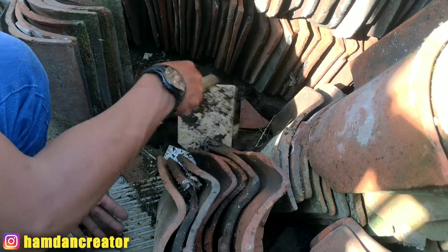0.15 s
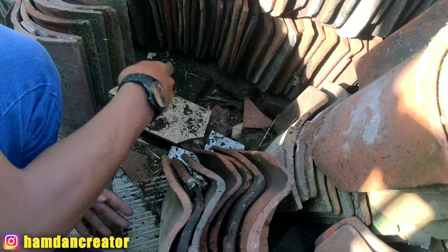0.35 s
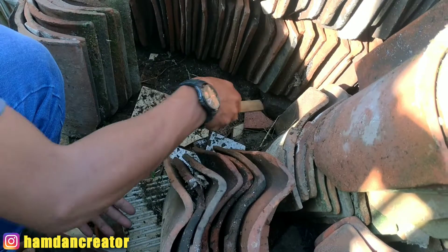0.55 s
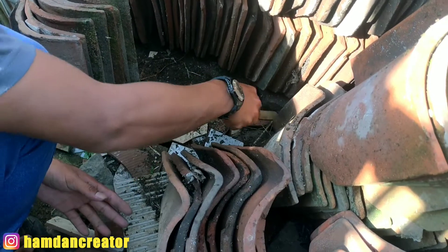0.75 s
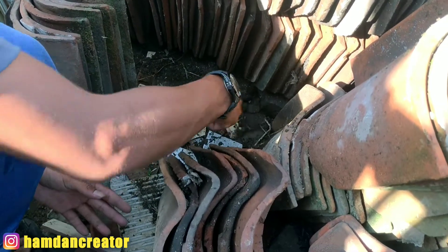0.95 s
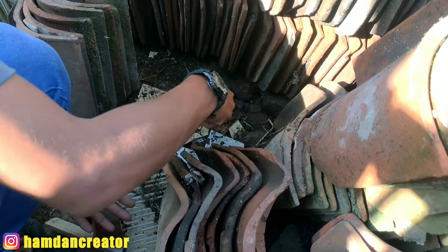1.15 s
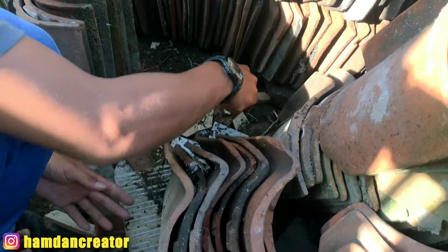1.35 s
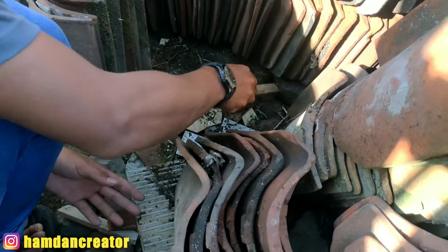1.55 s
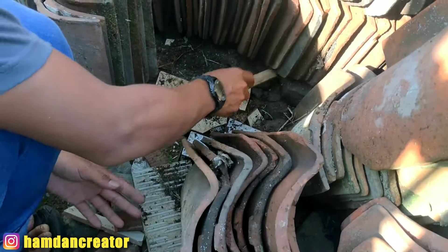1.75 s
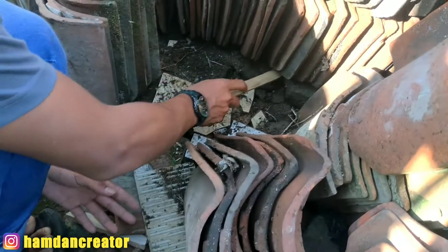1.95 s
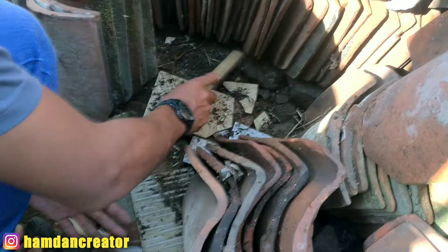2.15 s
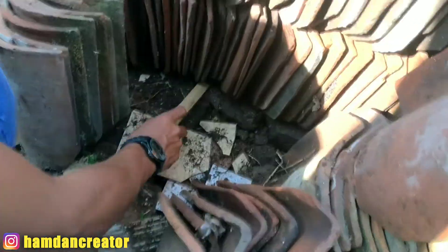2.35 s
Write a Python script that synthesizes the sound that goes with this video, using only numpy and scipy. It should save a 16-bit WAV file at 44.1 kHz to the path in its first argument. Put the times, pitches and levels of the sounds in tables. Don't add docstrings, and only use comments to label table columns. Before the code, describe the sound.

Clay roof tiles knock together, close and outdoors. Gritty scraping and a light knock start it; from 0.24 to 0.46 s irregular clacks crowd together, one ringing at 0.36 then deadened on soil. Faint scrapes and ticks follow from 0.73, then the loudest hard crack at 0.98-1.0. After a near-quiet gap, small ticks at 1.7, a sharper click at 2.1 and soft rustling ticks from 2.3, with quick echoes over faint low traffic hum.

```python
import sys
import numpy as np
from scipy import signal
from scipy.fft import rfft, irfft
from scipy.io import wavfile

SR = 44100
rng = np.random.default_rng(int(sys.argv[2]) if len(sys.argv) > 2 else 0)


def gain_from_db(level_db):
    decades = np.asarray(level_db, float) / 20
    return 10 ** decades


def wrap_up_sound(samples):
    columns = np.atleast_2d(samples).T
    tamed = np.clip(columns, -1, 1)
    steps = np.round(tamed * 32767).astype(np.int16)
    wavfile.write(sys.argv[1], SR, steps)


N = 110250

# [f/Hz, correlation]
AIR_SPECTRUM = [(15, -38), (25, -27.5), (59, -1), (260, -8.5), (313, -12.5), (421, -13.5), (2230, -17),
                (5500, -22), (15500, -37)]
AIR_LIKENESS = [(60, 0.91), (150, 1), (380, 0.56), (2380, -0.13), (15000, 0.078)]

# [t/s, length/s, level/dB, brightness/dB per octave]
SCRAPES = [(0.01, 0.068, -35, 4), (0.067, 0.072, -46, 3.5), (0.116, 0.096, -30.5, 3),
           (0.199, 0.057, -39, 2), (0.408, 0.11, -35, 1.8), (0.732, 0.18, -41.5, 0.5),
           (0.818, 0.11, -54.5, 8), (0.899, 0.044, -36.5, 2.5), (0.932, 0.13, -35, 1.5), (1, .045, -42, 15),
           (1.682, 0.11, -47.5, 0.5), (2.072, 0.056, -34, -1.2), (2.28, 0.054, -44, 2),
           (2.35, 0.11, -52, 5.5), (2.413, 0.11, -43.5, -1.1)]
# [f/Hz, level/dB per Hz]
GRIT_SPECTRUM = [(150, 7), (250, -0.5), (669, -1), (809, -5.5), (1360, -15), (2800, -9), (3110, -7),
                 (4320, -12), (15500, -27)]
# [f/Hz, level/dB, t60/s]
HELD_TILE_MODES = [(824, -3.5, 0.022), (1550, -7.5, 0.03), (2027, -1.5, 0.022), (2785, 1.5, 0.022),
                   (4040, -16, .02), (4270, -6, 0.02), (4660, -5.5, .01), (5170, -7.5, .012),
                   (6630, -6.5, 0.0031), (9300, -15.5, 0.013), (10800, -15.5, 0.0055),
                   (12760, -19.5, 0.0036)]

# [t/s, peak level/dB]
THUDS = [
    (0.098, -25.5),
    (0.741, -27),
    (2.466, -28),
]

# [f/Hz, level/dB, t60/s]
FACE_MODES = [(780, -1.5, 0.54), (879, -5.5, 0.25), (1939, -11, 0.15), (2130, -23, 0.092),
              (2500, -13, 0.12), (2600, -7, 0.069), (3350, -18, .076), (4212, -4, 0.061), (5096, -2, 0.059),
              (5180, -3, 0.052), (5740, -19, 0.048), (6550, -10.5, 0.04), (6971, -23, 0.044),
              (8990, -12.5, 0.042)]
EDGE_MODES = [(840, -7, 0.11), (1570, 11, 0.043), (4650, 2.5, 0.11), (5610, -2.5, 0.074), (9000, -9, 0.033)]
BACK_MODES = [(778.7, -7, 0.23), (878, -15, 0.19), (1542, -19, 0.21), (2478, -8.5, 0.1),
              (2449, -5.5, 0.095), (3377, -5.5, 0.043), (4177, -10, 0.047), (4630, -13.5, 0.043),
              (5070, -11, 0.03), (6720, -19, 0.034)]
CORNER_MODES = [(1556, -15.5, 0.15), (2726, -12.5, 0.1), (3560, -11, 0.036), (4190, 0, 0.035),
                (4600, -11, 0.057), (4850, -18, .07), (5150, 0, 0.036), (5850, -2.5, 0.033),
                (6476, -8.5, 0.049), (11100, -31, 0.059)]
ROCKING_MODES = [(795.4, -9.5, 0.15), (876, -5, 0.12), (1573, 0.5, 0.089), (2470, -3.5, 0.095),
                 (4640, -7.5, 0.074)]
CHIP_MODES = [(3400, -15, .05), (4700, -19, 0.054), (6830, -3, 0.05), (8650, -16, 0.041),
              (11470, -9, 0.022), (12600, -16, .03), (14800, -17, .02)]
# [t/s, peak level/dB, ring level/dB re peak, hardness/dB per octave, crack level/dB re peak]
FACE_BLOWS = [
    (0.139, -17.5, -13.5, -1.4, 1),
    (0.355, -1, -7.5, 0.33, -6),
    (0.367, -14, -13.5, -0.74, 1),
]
EDGE_BLOWS = [
    (0.2396, -11, -11.5, 0, 4.5),
    (0.245, -6, -38, 1.5, -1.5),
]
BACK_BLOWS = [
    (.2730, -14.5, -7.5, 0.8, -11),
    (0.9766, -6.5, -22, 4.9, 3.5),
    (.9940, 2.5, -7.5, 0.64, -3.5),
    (1.011, -17.5, -7, 0.34, -24),
    (1.0745, -27.5, -8, 0.33, -16),
]
CORNER_BLOWS = [
    (.2970, -10.5, -8.5, 2.2, -4.5),
    (.3110, -4.5, -7.5, 0.44, -2.5),
    (0.4374, -19, -30, 2.1, 6.5),
]
ROCKING_BLOWS = [
    (0.413, -12, -6.5, 1, -11),
    (0.423, -15, -10, -2, 2),
    (0.46, -13, -9, -6, -5),
    (0.53, -30.5, -7.5, -4, 3.5),
]
CHIP_BLOWS = [
    (0.848, -20.5, -1.8, 0.1, -11.5),
]
# [f/Hz, level/dB per Hz]
CRACK_SPECTRUM = [(88, -45), (150, -31), (420, -13.5), (660, 4), (3040, -4), (5030, -6), (7130, -6.5),
                  (7860, -29), (9920, -12.5), (15500, -68)]

# [t/s, peak level/dB, f/Hz, t60/s, broad part
# level/dB]
TICKS = [(0.355, 4.5, 693, 0.014, -23), (0.747, -31, 456, 0.037, 1), (0.779, -29.5, 653, 0.023, -19),
         (0.824, -23, 1920, 0.017, 4), (0.915, -29.5, 3500, 0.042, -2), (1.144, -29, 1442, 0.056, -3),
         (1.692, -24.5, 540, 0.045, -1), (2.052, -27, 662, 0.089, -11.5),
         (2.106, -10.5, 1943, 0.014, 0.5), (2.122, -27.5, 556, 0.1, -5),
         (2.166, -24, 2200, 0.028, -1.5), (2.307, -31, 1375, 0.043, -11),
         (2.345, -17.5, 735, 0.014, -4.5), (2.375, -29, 1180, 0.028, -4),
         (2.447, -21, 730, 0.033, -14), (2.464, -27, 693, 0.074, -6),
         (0.366, -14, 6800, 0.01, -3), (0.4131, -6, 4210, 0.025, -9), (.438, -11.5, 4700, 0.011, -5),
                (.441, -24, 8270, 0.046, -12), (0.91, -28, 5900, 0.014, 2), (0.96, -32, 3520, .012, -9),
                (1, -32, 11700, .012, -3), (.844, -25, 11700, 0.013, -13), (.917, -29, 910, 0.018, -6),
                (0.59, -30, 6800, 0.0092, -4), (1.1, -36, 11800, .015, -12), (.955, -22, 6500, 0.018, -9),
                (0.9766, -2, 7260, .012, -14), (1.703, -29, 800, 0.024, 0), (2.1, -40, 10300, .012, -3),
                (2.1072, -8.5, 3400, 0.015, -2.5), (2.111, -11, 5370, .01, -13),
                (2.116, -19, 1050, .025, -17), (2.126, -21, 6300, 0.0085, 5),
                (2.134, -27.5, 420, 0.039, -12), (2.4, -30, 3900, .012, -6),
                (2.3453, -17.5, 5050, 0.0062, -12), (2.378, -27, 3900, .008, -6),
                (2.472, -26.5, 976, 0.033, -8)]

# [f/Hz, level/dB]
PORT_BALANCE = [(240, 0), (950, -1), (1600, -4), (2500, 5), (3600, -5.5), (5000, -13), (9000, -1),
                (15000, 9.5)]
SOIL_PORT_BALANCE = [(300, -0.3), (1000, 3.5), (2500, 0.3), (5000, -3), (10000, -1.3)]

CONTACT_S = 0.0017


def rms_one(x):
    return x / np.sqrt(np.mean(x ** 2) + 1e-20)


def at_hz(points, hz):
    table_hz, value = np.array(points)[:, :2].T
    return np.interp(np.log(hz), np.log(table_hz), value)


def colour(x, points, slope_db=0.):
    hz = np.maximum(np.fft.rfftfreq(x.shape[-1], 1 / SR), 10)
    gain = gain_from_db(at_hz(points, hz) + slope_db * np.log2(hz / 3000))
    return irfft(rfft(x) * gain, x.shape[-1])


def drift(rate):
    r = np.exp(-80 * np.pi * rate / SR)
    slow = signal.lfilter([1], [1, -2 * r, r * r], rng.standard_normal(N // 40 + 2002))[2000:]
    return np.interp(np.arange(N) / 40, np.arange(len(slow)), rms_one(slow))


def ring(clicks, hz, t60):
    r = gain_from_db(-60 / (np.clip(t60, 0.004, 0.4) * SR))
    w = 2 * np.pi * hz / SR
    return signal.lfilter([0, np.sin(w)], [1, -2 * r * np.cos(w), r * r], clicks + 1e-18)


def add(out, s, x):
    i = int(s * SR)
    out[i:i + len(x)] += x[:N - i]


def dying(t60, size=6000):
    return gain_from_db(-60 * np.arange(size) / SR / max(t60, 0.003))


def air():
    patchy_db, air_db = 3, -46.5
    hum_hz, hum_width_hz, hum_db = 53.7, 6.5, -56.5
    out = 0
    together = drift(2.5)
    edges = 22 * 2 ** np.arange(0, 9.6, 0.5)
    white = rng.standard_normal((2, 2, N))
    for k, (low, high) in enumerate(zip(edges, edges[1:])):
        band = signal.butter(2, [low, high], "band", fs=SR, output="sos")
        mid, side = signal.sosfilt(band, white[k % 2])
        hz = np.sqrt(low * high)
        alike = np.clip(at_hz(AIR_LIKENESS, hz), -1, 1)
        flicker_db = patchy_db * min(1, 300 / hz) ** 0.5 * (0.5 * together + drift(10))
        stereo = np.sqrt(1 + alike) * mid + np.sqrt(1 - alike) * side * [[1], [-1]]
        out = out + gain_from_db(at_hz(AIR_SPECTRUM, hz) + flicker_db) * stereo
    hum = rms_one(ring(rng.standard_normal(N), hum_hz, 6.1 / hum_width_hz))
    return gain_from_db(air_db) * rms_one(out) + gain_from_db(hum_db) * np.array([hum, 0.7 * np.roll(hum, 90)])


def grit_grains():
    grains_per_s, spread_db, stutter_db, stutter_per_s = 5000, 5, 1.5, 70
    size_db = spread_db * np.minimum(rng.exponential(1, N), 3)
    height = gain_from_db(size_db + stutter_db * drift(stutter_per_s))
    return height * rng.choice([-1, 1], N) * (rng.random(N) < grains_per_s / SR)


def held_tile(grains):
    flicker_db, flicker_per_s = 5, 25
    body = 0
    for hz, db, t60 in HELD_TILE_MODES:
        body = body + gain_from_db(db + flicker_db * drift(flicker_per_s)) * rms_one(ring(grains, hz, t60))
    return rms_one(body)


def scrapes():
    ring_db, on_soil_s, on_soil_db = -2.5, 0.6, -9
    rise, fall = 0.23, 0.3
    grains = grit_grains()
    ring_gain = gain_from_db(ring_db + on_soil_db * (np.arange(N) > on_soil_s * SR))
    grit = rms_one(colour(grains, GRIT_SPECTRUM)) + ring_gain * held_tile(grains)
    out = np.zeros(N)
    for s, length, db, slope_db in SCRAPES:
        u = np.linspace(0, 1, 2 + int(length * SR))
        stroke = np.clip(np.minimum(u / rise, (1 - u) / fall), 0, 1)
        part = grit[int(s * SR):][:len(u)]
        tilted = rms_one(colour(part, [(1, 0), (2, 0)], slope_db))
        add(out, s, gain_from_db(db) * stroke[:len(part)] * tilted)
    return out


def thuds():
    out = np.zeros(N)
    for s, db in THUDS:
        rumble = rms_one(ring(rng.standard_normal(6000), 70, 0.0215))
        add(out, s, gain_from_db(db + 4.5) * rumble * dying(0.082) * (1 - dying(0.1)))
    return out


def crack(slope_db):
    split_hz = 7300
    noise = rms_one(colour(rng.standard_normal(6000), CRACK_SPECTRUM, slope_db))
    top = signal.sosfilt(signal.butter(2, split_hz, "high", fs=SR, output="sos"), noise)
    low = signal.sosfilt(signal.butter(2, split_hz, fs=SR, output="sos"), noise)
    snap = gain_from_db(6) * dying(0.0036)
    tail = gain_from_db(-19.5) * dying(0.22)
    envelope = (1 - dying(CONTACT_S)) * (snap + dying(0.017) + tail)
    return gain_from_db(-1.0) * top * dying(0.0077) + gain_from_db(-3.5) * (low + gain_from_db(-7.5) * top) * envelope


def piece(modes, blows):
    out = np.zeros(N)
    s, db, ring_db, hard_db, crack_db = np.transpose(blows)
    for hz, level_db, t60 in modes:
        clicks = np.zeros(N)
        clicks[(s * SR).astype(int)] = gain_from_db(db + ring_db + level_db + hard_db * np.log2(hz / 2000))
        out += ring(clicks, hz, t60)
    for at, peak_db, slope_db in zip(s, db + crack_db, hard_db):
        add(out, at, gain_from_db(peak_db) * crack(slope_db))
    return out


def ticks():
    out = np.zeros(N)
    for s, db, hz, t60, wide_db in TICKS:
        rough, broad = rng.standard_normal((2, 6000))
        body = ring(rough * dying(0.013), hz, t60)
        wide = rms_one(colour(broad, CRACK_SPECTRUM)) * dying(t60) * (1 - dying(CONTACT_S))
        add(out, s, gain_from_db(db - 6.5) * (body / np.abs(body).max() + gain_from_db(wide_db) * wide))
    return out


def hollow(x, lead, pan_db, soil=0):
    left_lead_s, delay_s, work_low_hz = 0.00014, 0.000818, 197
    echo_db, echo_t60_s, echo_low_hz, echo_cut_hz = -5, 0.051, 1020, 12000
    size = N + 8000
    hz = np.maximum(np.fft.rfftfreq(size, 1 / SR), 10)
    balance_db = at_hz(PORT_BALANCE, hz) + soil * at_hz(SOIL_PORT_BALANCE, hz) + pan_db
    half = gain_from_db(balance_db / 2) * np.exp(1j * np.pi * hz * lead * left_lead_s)
    echoes = rng.standard_normal((2, 6000)) * dying(echo_t60_s) * (np.arange(6000) > 60)
    echoes = gain_from_db(echo_db) * rfft(echoes / np.sqrt(np.sum(echoes ** 2) / 2), size)
    echoes = echoes / (1 + 1j * hz / echo_cut_hz) / (1 - 1j * echo_low_hz / hz)
    path = np.exp(-2j * np.pi * hz * delay_s) / (1 - 1j * work_low_hz / hz) ** 2
    return irfft(rfft(x, size) * path * (np.array([half, 1 / half]) + echoes), size)[:, :N]


def scene():
    lands_s, landed_t60_s = 0.408, 0.089
    damped = gain_from_db(-60 * np.maximum(np.arange(N) / SR - lands_s, 0) / landed_t60_s)
    front = damped * piece(FACE_MODES, FACE_BLOWS)
    front = front + piece(ROCKING_MODES, ROCKING_BLOWS) + piece(EDGE_MODES, EDGE_BLOWS)
    back = piece(BACK_MODES, BACK_BLOWS) + piece(CORNER_MODES, CORNER_BLOWS) + piece(CHIP_MODES, CHIP_BLOWS)
    work = hollow(front, 0.98, -0.83) + hollow(back, 0.18, 0.17)
    work = work + hollow(ticks(), -0.62, 0.33, 0.88) + hollow(scrapes(), 0.73, -0.91, 0.83)
    thud = thuds()
    ground = gain_from_db([[1.6], [-1.6]]) * np.array([thud, np.roll(thud, 70)])
    return work + ground + air()


def top_cut(x):
    return signal.sosfilt(signal.butter(12, 15680, fs=SR, output="sos"), x)


def record(dry):
    top = 0.83
    rounded = top * np.tanh(dry / top)
    rounded = signal.sosfilt(signal.butter(6, 44, "high", fs=SR, output="sos"), rounded)
    rounded = signal.sosfilt(signal.cheby2(10, 50, 15700, fs=SR, output="sos"), rounded)
    return top_cut(np.clip(rounded, -1, 1))


dry = scene()
out = record(dry)
wrap_up_sound(out)
```